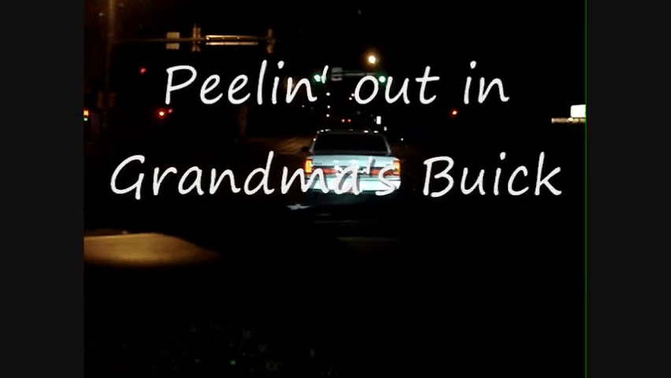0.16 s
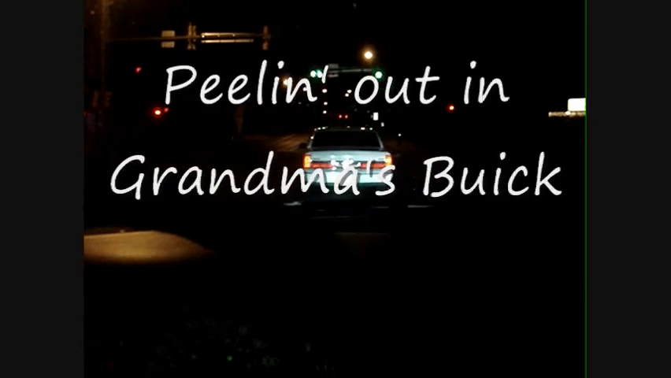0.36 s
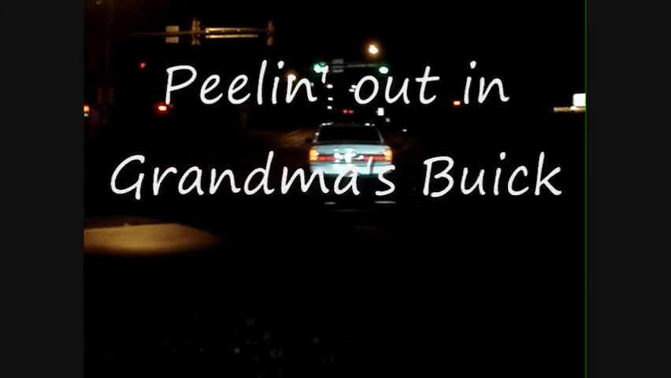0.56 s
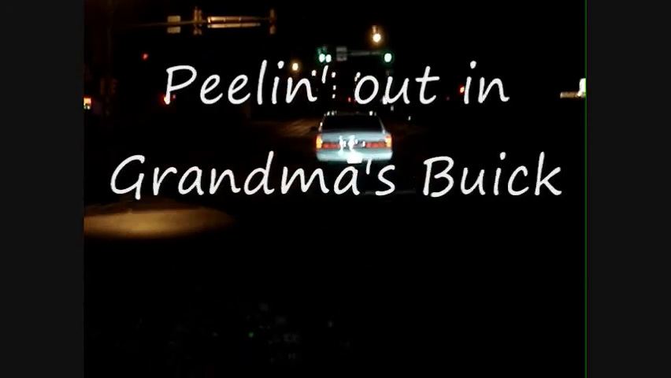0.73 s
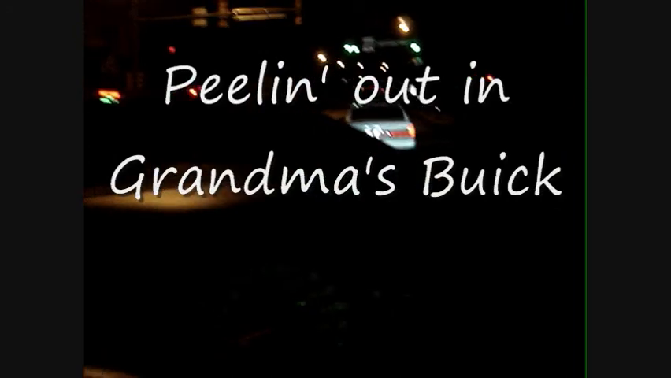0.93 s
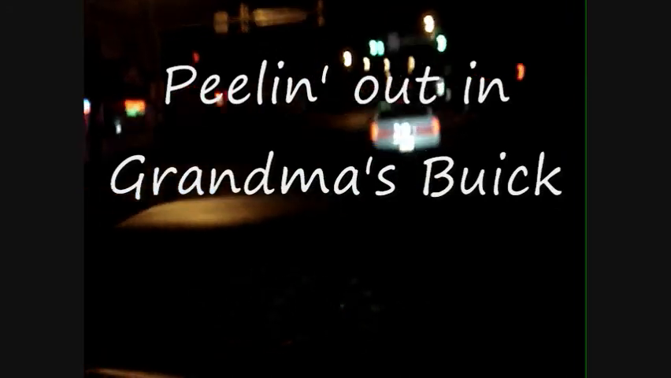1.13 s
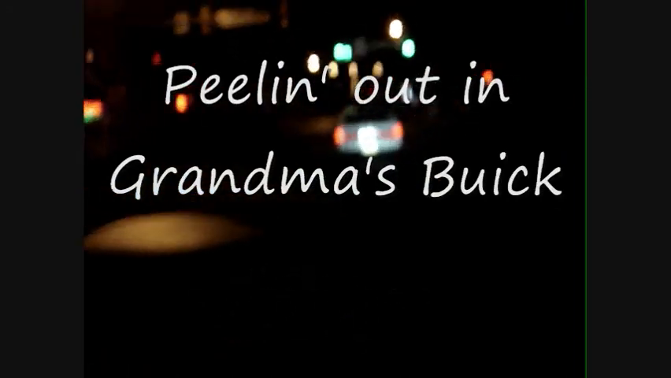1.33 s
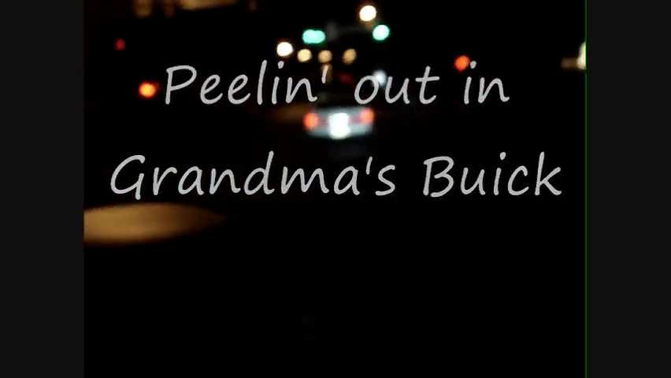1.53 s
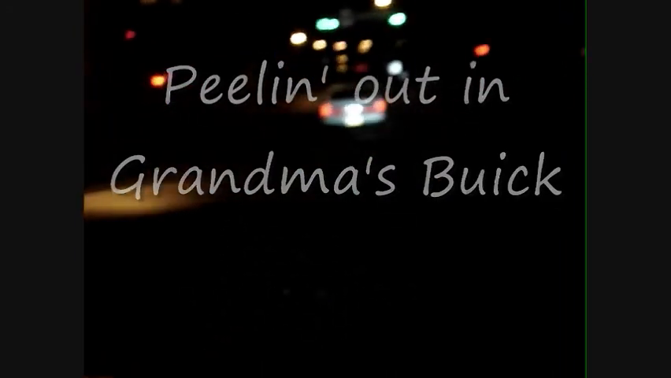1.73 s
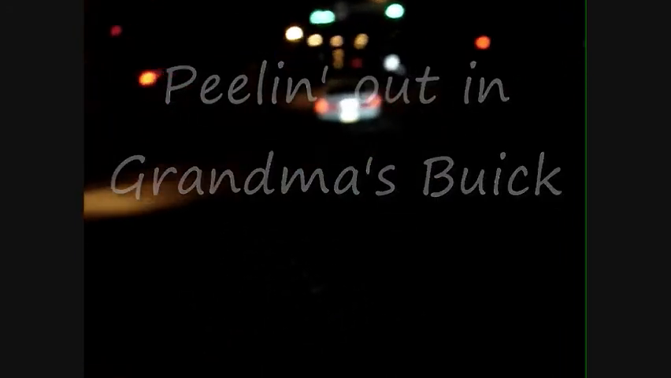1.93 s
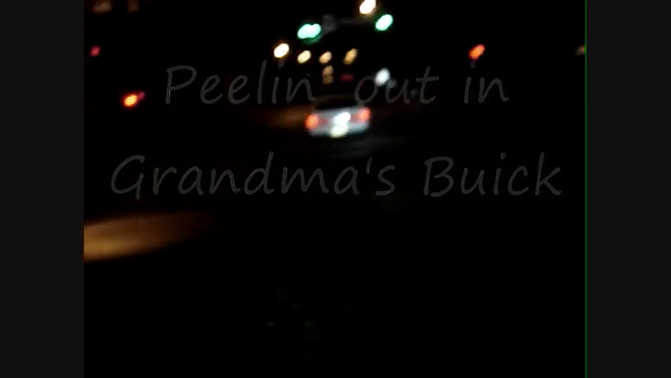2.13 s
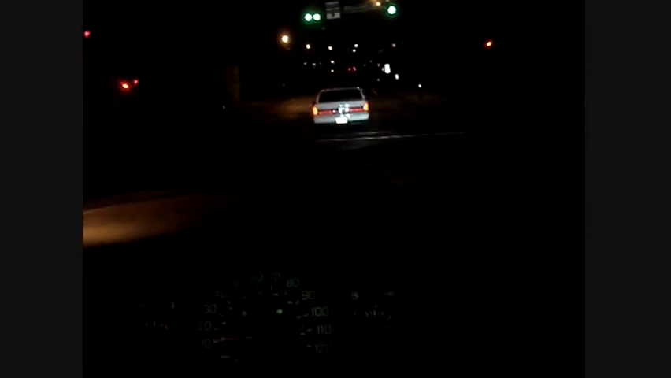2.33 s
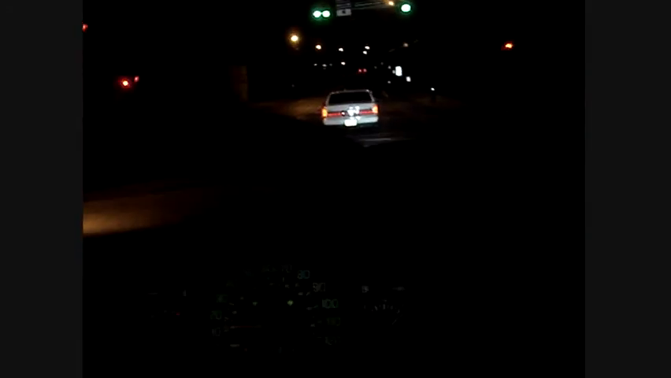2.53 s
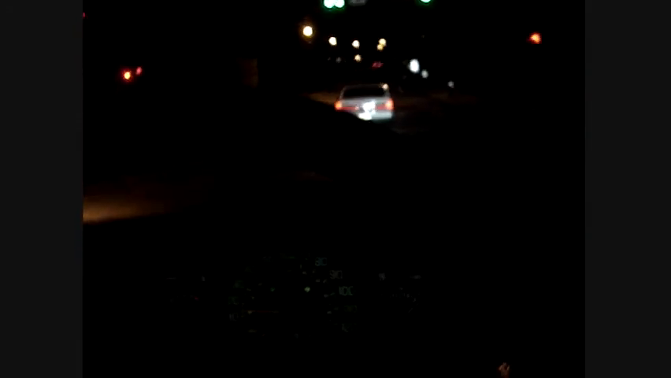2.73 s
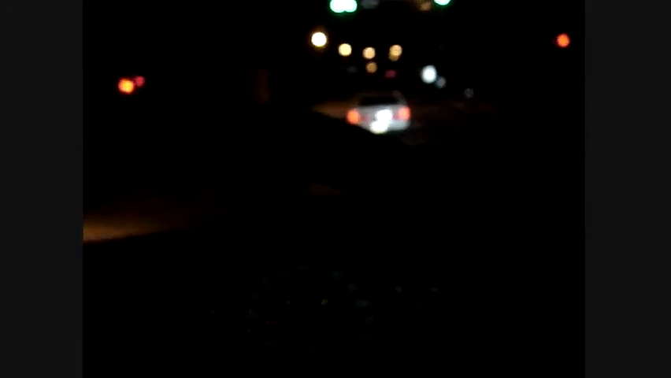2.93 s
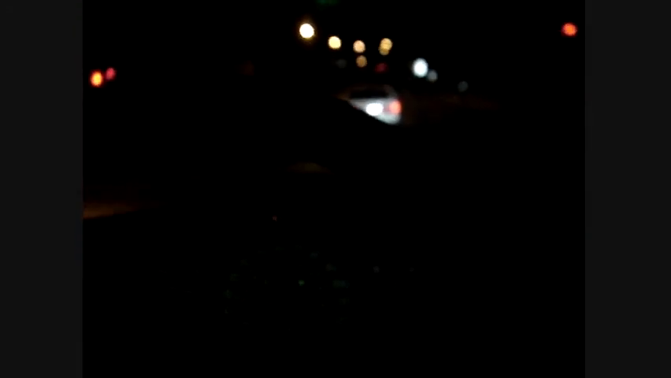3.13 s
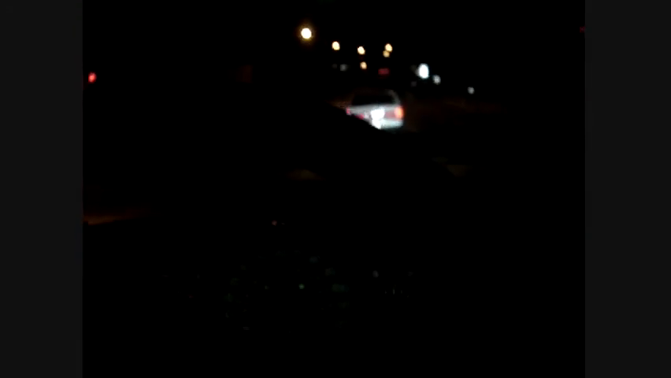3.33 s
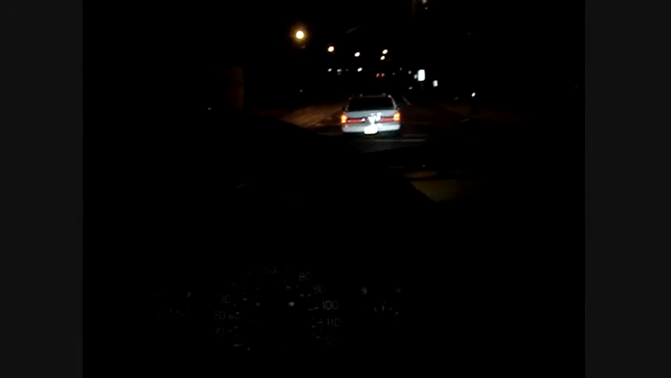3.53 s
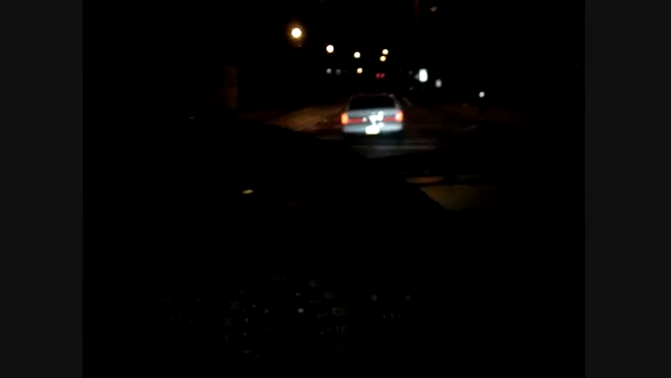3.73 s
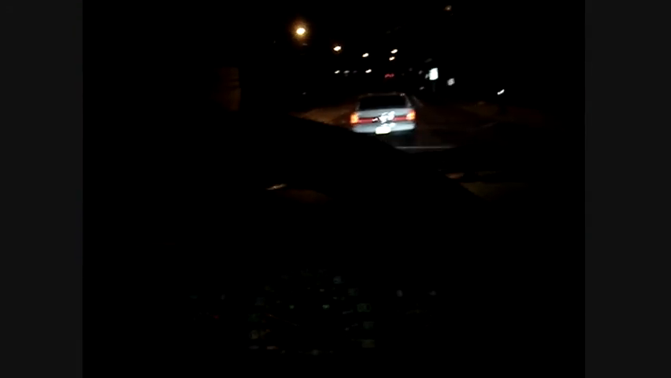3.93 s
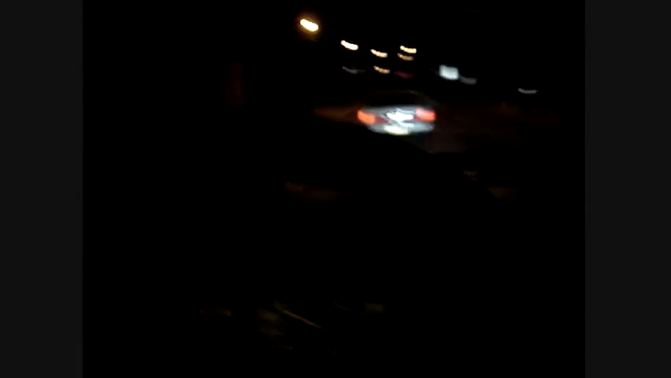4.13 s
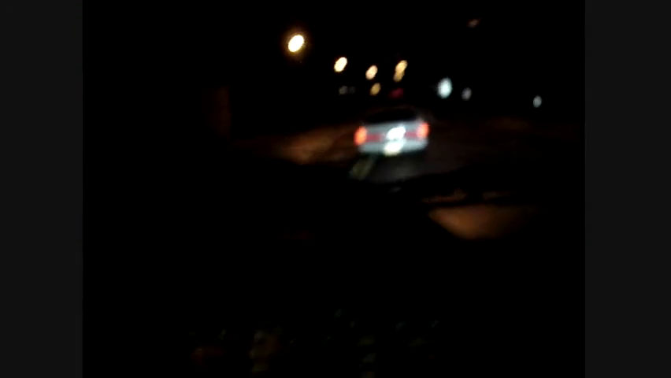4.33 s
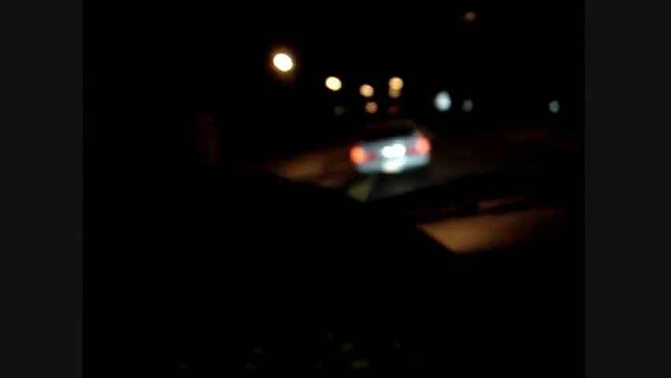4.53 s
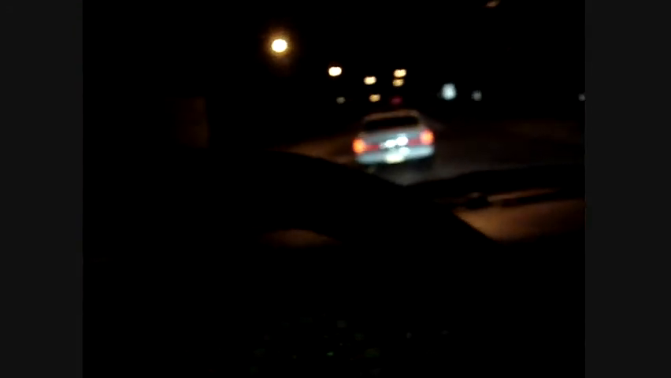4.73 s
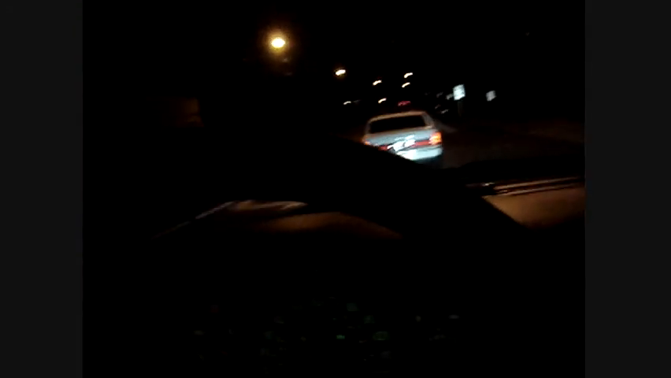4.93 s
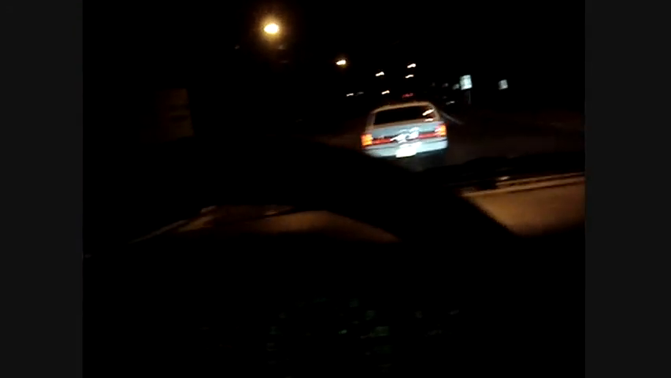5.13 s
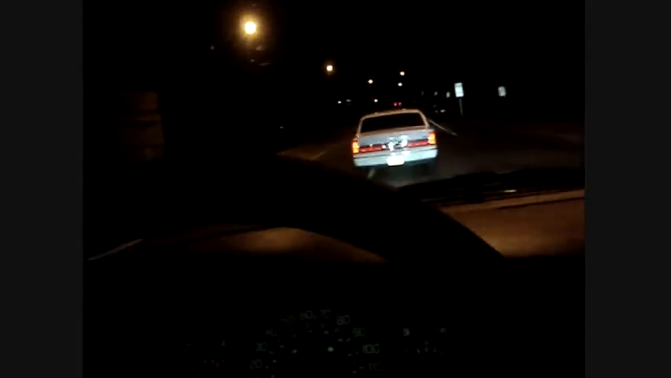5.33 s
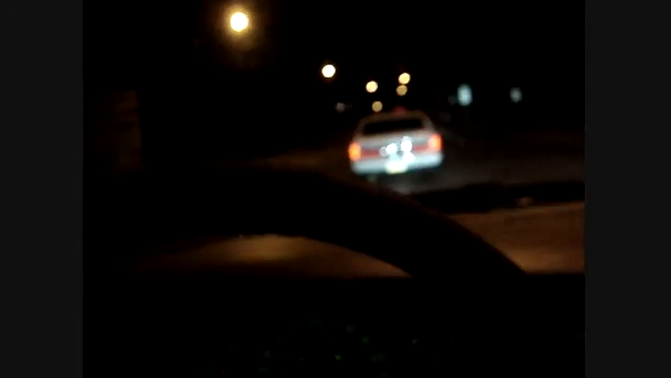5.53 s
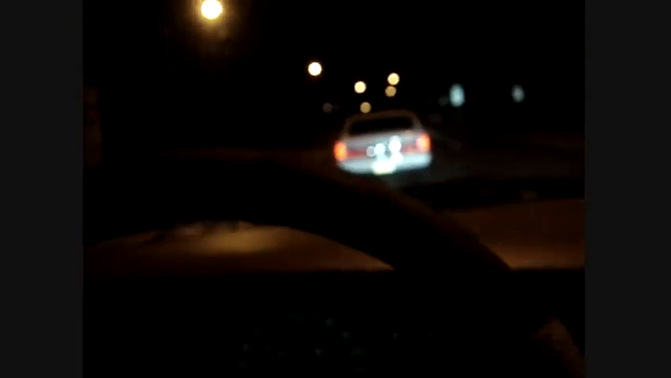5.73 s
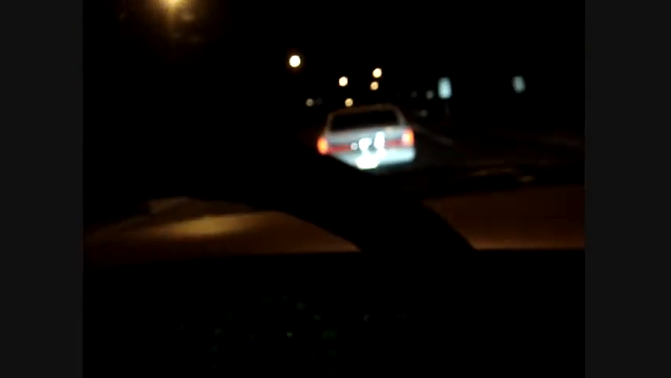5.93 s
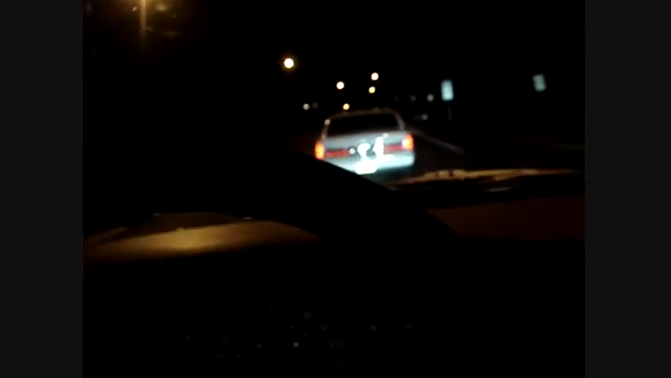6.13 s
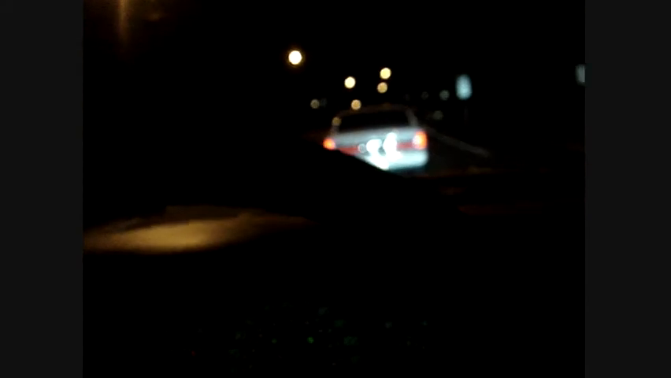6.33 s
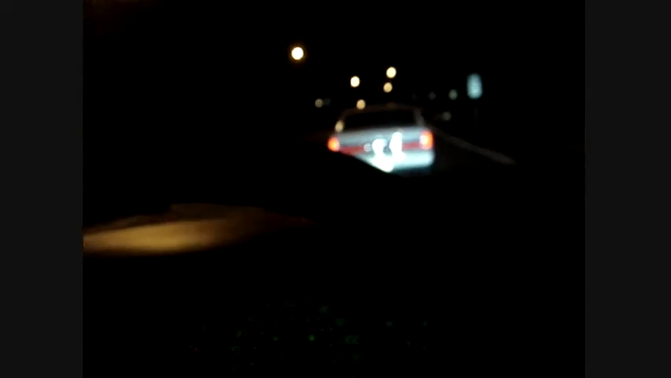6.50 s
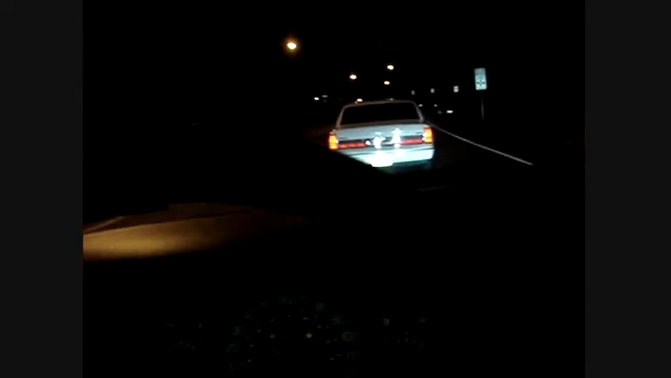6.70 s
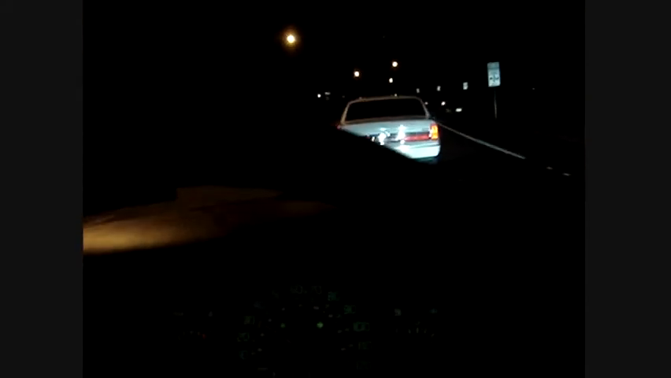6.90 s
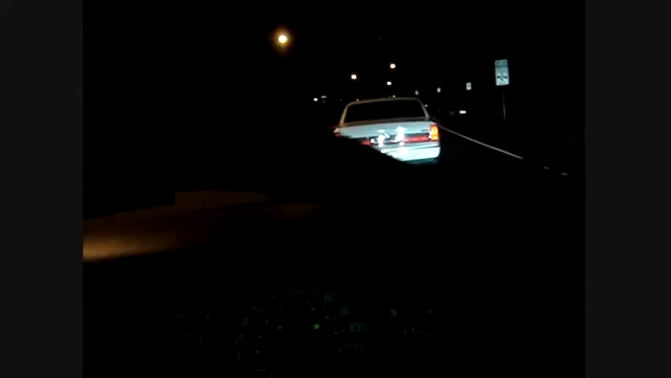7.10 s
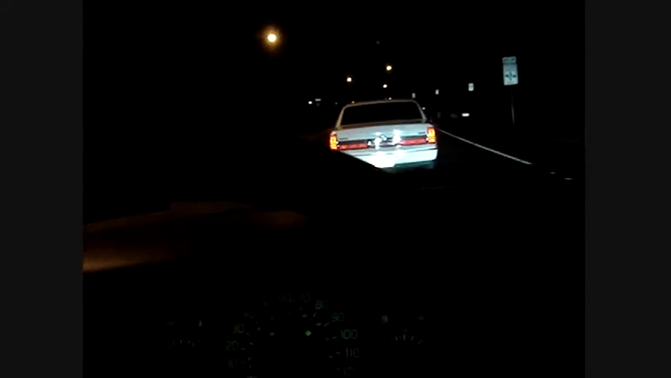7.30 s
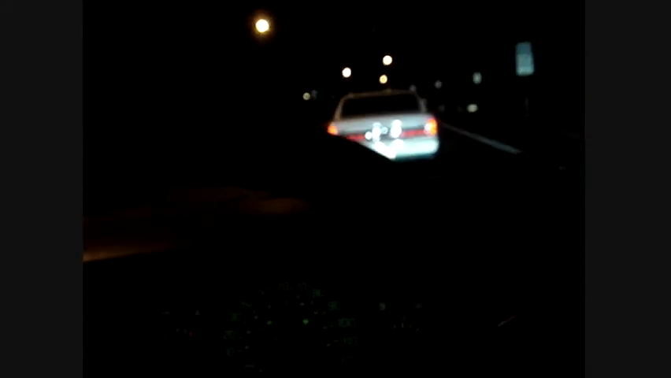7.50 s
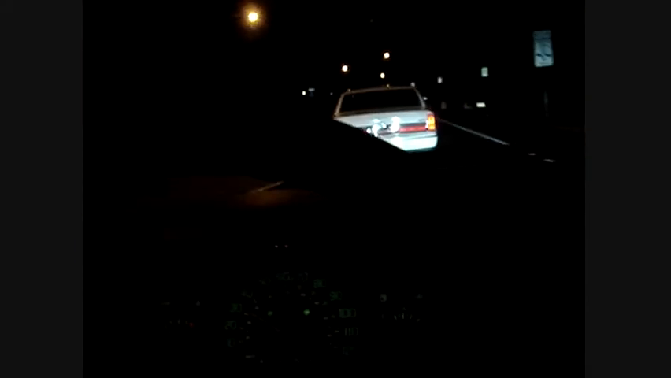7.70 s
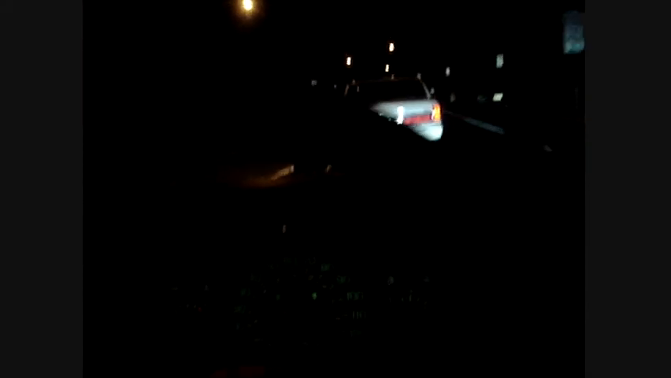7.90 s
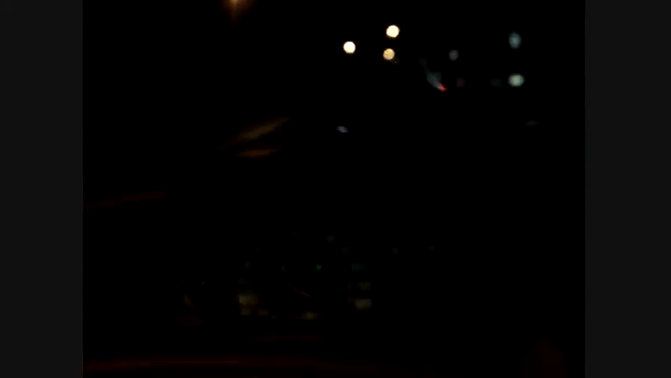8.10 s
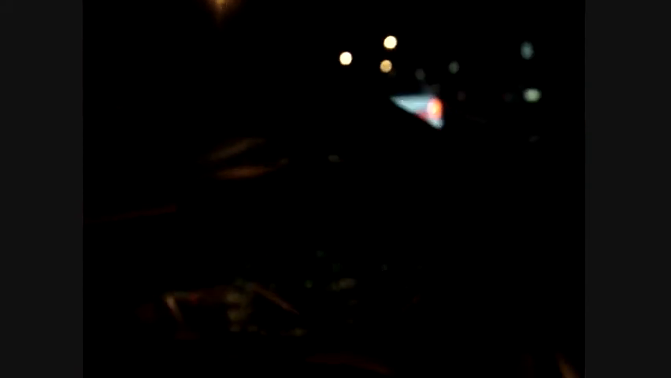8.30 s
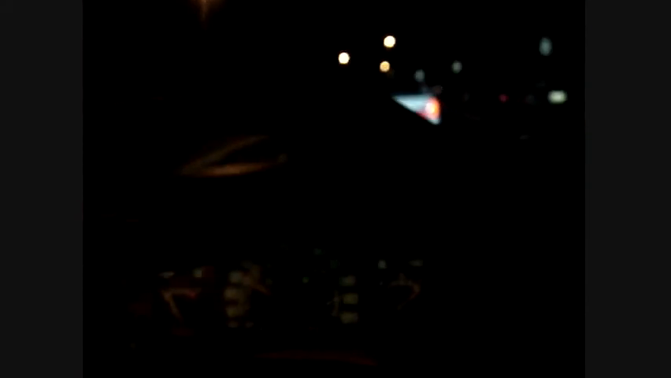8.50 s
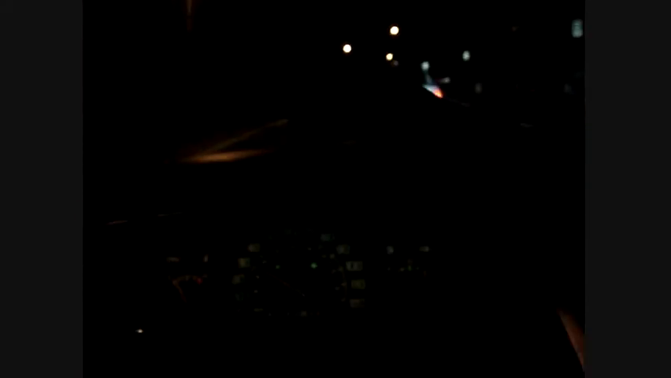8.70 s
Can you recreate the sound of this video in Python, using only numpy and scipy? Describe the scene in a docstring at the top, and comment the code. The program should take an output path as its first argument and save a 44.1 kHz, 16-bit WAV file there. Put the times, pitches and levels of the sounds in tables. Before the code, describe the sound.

Inside a loud V8 car: lumpy idle, sudden hard launch with squealing tyres, engine climbing to a roar, lift-off, coasting, then throttle picks up again.

```python
"""Hard launch from inside a V8 car

With loud mufflers the car idles, launches with both rear tyres squealing, revs up through first gear,
lifts off, coasts and picks up again. The engine is a stack of sine orders locked to its cycle, with gas noise;
the squeals are jittery tones with overtones; boom, road, rasp, hiss and cabin drone are shaped noise.
A loose plastic part ticks close to the microphone: noise chatter ringing a bank of resonances."""
import sys
import numpy as np
from scipy import signal
from scipy.fft import rfft, irfft, next_fast_len
from scipy.io import wavfile
from scipy.ndimage import uniform_filter1d

SR = 44100
rng = np.random.default_rng(int(sys.argv[2]) if len(sys.argv) > 2 else 0)


def wrap_up_sound(samples):
    """Save the sound to the file named by the first command line argument, as 16-bit audio."""
    columns = np.atleast_2d(samples).T
    # keep every value between -1 and 1, then stretch to whole-number steps
    tamed = np.clip(columns, -1, 1)
    steps = np.round(tamed * 32767).astype(np.int16)
    wavfile.write(sys.argv[1], SR, steps)


N = 385875

# the throttle opens and shuts at these moments; each move takes one ramp
THROTTLE_OPENS_S, THROTTLE_SHUTS_S, THROTTLE_RAMP_S = 0.73, 4.3, 0.13


def from_db(db):
    """Gain of a level in dB."""
    return 10 ** (np.asarray(db) / 20)


def rms_one(x):
    """Scaled to rms 1."""
    return x / np.sqrt(np.mean(x ** 2) + 1e-20)


def in_time(rows):
    """Every column of a curve table, drawn as straight lines to every sample."""
    s, *columns = np.transpose(rows)
    return [np.interp(np.arange(N) / SR, s, column) for column in columns]


def drift(rate_hz):
    """Slow random wander of rms 1: noise at a twentieth of SR through two equal one-pole low-passes."""
    r = np.exp(-2 * np.pi * rate_hz * 20 / SR)
    noise = rng.standard_normal(N // 20 + 4002)
    slow = signal.lfilter([1], [1, -2 * r, r * r], noise)[4000:]   # settled part only
    return np.interp(np.arange(N) / 20, np.arange(len(slow)), rms_one(slow))


def swells(events, width_s):
    """Bell-shaped changes of level in dB around each event."""
    t = np.arange(N) / SR
    return sum(db * np.exp(-((t - s) / width_s) ** 2) for s, db in events)


def resonance(x, hz, width_hz):
    """Two-pole band-pass of gain 1 on top."""
    r = np.exp(-np.pi * width_hz / SR)
    zeros = (1 - r * r) / 2 * np.array([1, 0, -1])
    poles = [1, -2 * r * np.cos(2 * np.pi * hz / SR), r * r]
    return signal.lfilter(zeros, poles, x)


def coloured(spectrum, source):
    """A source shaped by a (Hz, dB) spectrum, straight lines over log frequency; rms 1."""
    hz, level_db = np.transpose(spectrum)
    size = next_fast_len(N + SR // 4)
    log_hz = np.log(np.arange(size // 2 + 1) * SR / size + 1e-3)
    gain = from_db(np.interp(log_hz, np.log(hz), level_db, left=-90, right=-90))
    return rms_one(irfft(rfft(source, size) * gain, size)[:N])


def pipes(x, resonances):
    """Resonances in a row, each lifting what passes through it."""
    for hz, width_hz, lift_db in resonances:
        x = x + (from_db(lift_db) - 1) * resonance(x, hz, width_hz)
    return x


def engine():
    """Eight firings a cycle give the main tone; other orders, the firing's own overtones among them, colour it."""
    # Engine speed. Each row: time in seconds, four-stroke cycles per second.
    speed = [(0, 4.6), (.6, 4.65), (.72, 6), (.8, 11.5), (.98, 15.4), (1.1, 16.9), (1.54, 19.3),
             (1.75, 19.9), (2.08, 18.6), (2.57, 20.54), (3.45, 24.85), (4.22, 29), (4.32, 28.4),
             (4.49, 24.5), (4.83, 20.6), (4.93, 19.55), (5.04, 16.8), (5.16, 14.7), (5.3, 13.3),
             (5.7, 11.8), (7.95, 10), (8.08, 10.7), (8.2, 12.1), (8.32, 13), (8.47, 13.5), (8.75, 13.7)]
    # Engine effort. Each row: time in seconds, firing tone in dB before the response,
    # load as the level of the other orders in dB.
    effort = [(0, -45, -58), (.62, -42.5, -56), (.8, -24, -25.5), (1, -19.5, -19), (1.2, -21.5, -20),
              (1.45, -37, -29.5), (1.75, -33, -28), (2.3, -29.5, -26.5), (2.6, -30.5, -21),
              (3.2, -27.5, -21.5), (4.15, -23, -19.5), (4.4, -47, -31.5), (4.6, -56, -32),
              (4.78, -51, -36.5), (4.9, -22.5, -24), (5.05, -30.5, -32.5), (5.22, -43, -36.5),
              (5.5, -53, -43), (7.95, -55, -42), (8.2, -22, -29), (8.4, -28.5, -29.5), (8.75, -27, -28)]
    # Balance of the other orders. Each row: multiple of the cycle rate, relative level in dB.
    other_orders = [(1, -23), (2, -25), (3, -9), (4, 6), (6, -0.5), (7, -3), (9, 0.5), (10, -3.5), (11, 2),
                    (12, -5), (13, -34), (14, 2), (17, -3.5), (19, -12), (20, -5.5), (21, -4), (22, -5),
                    (23, -22), (25, -2), (26, -10), (27, -21.5), (28, -4), (29, -18), (30, -5), (31, -12.5),
                    (32, -7), (33, -27.5), (34, -18.5), (35, -20.5), (36, -15), (37, -29.5), (38, -7),
                    (39, -12), (40, -23), (41, -39), (42, -18), (43, -27), (44, -8.5)]
    # Orders that stand out on open throttle. Each row: multiple of the cycle rate, level in dB against the load.
    standouts = [(5, -8), (15, -9.5), (16, -11.5), (18, -8), (24, -7.5)]
    # How exhaust and cabin pass a tone that sweeps through them. Each row: frequency in Hz, gain in dB.
    response = [(35, 2.5), (70, -10), (105, 1.5), (128, 7.5), (146, -1.5), (157, 8.5), (170, -1.5),
                (187, 5), (201, -11), (215, 5.5), (240, -5), (270, -8.5), (305, 10), (328, 8.5), (360, -6),
                (382, -13), (403, 0), (440, -4), (470, -1), (545, -17), (605, -4), (700, -5)]
    # Resonances of pipes and cabin. Each row: frequency in Hz, width in Hz, lift in dB.
    pipe_modes = [(125.8, 24, 10), (158.5, 40, 7), (234, 14, 2), (305.2, 37.6, 12.5), (414, 41, 4.5),
                  (611.7, 30.6, 13.5), (980, 83, 6), (1647, 31, 10.5), (4460, 490, -16.5)]
    # Colour of the gas noise. Each row: frequency in Hz, relative level in dB per Hz.
    roar_colour = [(35, -45), (60, -18), (119, -8.5), (203, -2), (319, -9.5), (468, -12), (606, -16.5),
                   (734, -8.5), (949, -23), (1080, -29.5), (4070, -33), (10000, -61), (13000, -95),
                   (22000, -120)]
    shut_tilt_db = -6   # per octave above the firing tone: the orders are duller once the throttle shuts
    roar_at_load_db, roar_follows = -28, 0.51   # at a load of -25 dB; share of the load's swing

    cycle_hz, = in_time(speed)
    firing_db, load_db = in_time(effort)
    t = np.arange(N) / SR
    since_open = t - THROTTLE_OPENS_S
    until_closed = THROTTLE_SHUTS_S + THROTTLE_RAMP_S - t
    pull = np.clip(np.minimum(since_open, until_closed) / THROTTLE_RAMP_S, 0, 1)
    turn = 2 * np.pi * np.cumsum(cycle_hz) / SR
    hz, pass_db = np.transpose(response)

    def tone(k, level_db):
        """One order, coloured by the response at its pitch of the moment."""
        gain = from_db(level_db + np.interp(np.log(k * cycle_hz), np.log(hz), pass_db))
        return np.sqrt(2) * gain * np.sin(k * turn + rng.uniform(0, 2 * np.pi))

    firing = tone(8, firing_db)
    leading = firing + pull * sum(tone(k, load_db + db) for k, db in standouts)

    orders = 0
    for k, level_db in other_orders:
        waver_db = 2.5 * drift(4)
        dull_db = shut_tilt_db * (1 - pull) * (t > THROTTLE_SHUTS_S) * np.log2(k / 8)
        phase = rng.uniform(0, 2 * np.pi)
        orders = orders + from_db(level_db + waver_db + dull_db) * np.sin(k * turn + phase)
    orders = pipes(orders, pipe_modes)
    # evened over half a second, so that the load sets the level
    orders = orders / np.sqrt(uniform_filter1d(orders ** 2, size=SR // 2))

    # gas noise swells with each firing and each cycle
    puffs = 1 + .4 * np.cos(8 * turn) + .3 * np.cos(turn)
    roar = pipes(coloured(roar_colour, puffs * rng.standard_normal(N)), pipe_modes)
    roar_db = roar_at_load_db + roar_follows * (load_db + 25)
    return leading + from_db(load_db) * orders + from_db(roar_db) * rms_one(roar)


def cabin():
    """Lumpy boom of the body, road noise with a tread resonance, a rasp of gas and rubber, and thin air hiss."""
    # Mix of the noises. Each row: time in seconds, body boom in dB before bumps and waver,
    # road noise in dB before the tread resonance, rasp in dB before its rings.
    mix = [(0, -41.5, -54.5, -58.5), (.65, -41, -52.5, -54.5), (.85, -40, -37, -42),
           (1.07, -36, -29.5, -36), (1.35, -38.5, -31.5, -35.5), (1.7, -45, -36, -40.5),
           (2, -43, -33, -43.5), (2.7, -34, -28, -39.5), (3.7, -28, -26, -38), (4.2, -22, -23, -33),
           (4.6, -30.5, -28.5, -42.5), (5.5, -32, -30.5, -48.5), (6.3, -34.5, -30.5, -49),
           (7.25, -36, -31.5, -52.5), (7.6, -26, -31.5, -51), (8, -26.5, -32, -49), (8.75, -32, -31, -50)]
    # Bumps in the road swell the boom. Each row: time in seconds, swell in dB.
    bumps = [(.95, 6), (1.34, 11.5), (1.61, 3), (2.17, 11), (2.31, 6), (2.56, 12), (2.85, 13), (3.24, 12),
             (3.75, 5.5), (3.97, 7), (4.46, 3), (4.85, 6), (5.02, 12), (5.21, 11), (5.34, 6.5), (5.68, 9),
             (5.85, 10.5), (6.48, 0), (6.63, 5), (8.43, 4)]
    # Colours of the four noises. Each row: frequency in Hz, relative level in dB per Hz.
    boom_colour = [(15, -24.5), (26, -10.5), (36, -1.5), (46, -3), (58, -6), (90, -11.5), (140, -18),
                   (200, -45.5)]
    road_colour = [(35, -40), (60, -13), (87, -3.5), (123, -2.5), (172, -14), (189, -19.5), (227, -10.5),
                   (342, -8), (375, -10.5), (730, -11), (928, -9.5), (1040, -15.5), (5000, -50),
                   (6500, -84), (11000, -120)]
    rasp_colour = [(900, -24.5), (1200, -9.5), (2100, -12.5), (3000, -16.5), (4500, -23.5), (7000, -28.5),
                   (12000, -57)]
    hiss_colour = [(1200, -17), (2500, -7.5), (5000, -12), (8000, -11), (12000, -6.5)]
    # The rasp rings faintly. Each row: frequency in Hz, width in Hz, lift in dB.
    rasp_rings = [(1605, 37, 4.5), (2210, 130, 1.5), (4230, 110, 5)]
    bump_s, boom_waver_db = 0.053, -1
    tread_hz, tread_width_hz, tread_db = 938, 26, 2
    hiss_at_rasp_db, hiss_follows = -55, 0.39   # at a rasp of -45 dB; share of the rasp's swing

    boom_db, road_db, rasp_db = in_time(mix)
    boom_db = boom_db + swells(bumps, bump_s) + boom_waver_db * drift(4.9)
    hiss_db = hiss_at_rasp_db + hiss_follows * (rasp_db + 45)
    hiss_db = hiss_db + 2.85 * drift(28)   # the hiss flickers
    boom = coloured(boom_colour, rng.standard_normal(N))
    road = coloured(road_colour, rng.standard_normal(N))
    road = road + from_db(tread_db) * resonance(road, tread_hz, tread_width_hz)
    rasp = pipes(coloured(rasp_colour, rng.standard_normal(N)), rasp_rings)
    hiss = coloured(hiss_colour, rng.standard_normal(N))
    low = from_db(boom_db) * boom + from_db(road_db) * road
    return low + from_db(rasp_db) * rasp + from_db(hiss_db) * hiss


def drone():
    """Engine and road shake two air modes: narrow noise, silent during the launch, heard at idle and from lift-off."""
    # Idle rows, then rows from lift-off on. Each row: time in seconds, lower mode in dB, upper mode in dB.
    idle, coast = [
        [(0, -41.5, -55), (.75, -47, -58)],
        [(4.3, -32, -30), (4.55, -24, -26), (4.9, -43, -32.5), (5.35, -28, -33.5), (5.6, -46, -40),
         (7.1, -49.5, -42), (7.3, -28.5, -41), (7.6, -44, -38), (7.85, -36, -55), (8, -42, -30),
         (8.35, -37, -27), (8.75, -45, -29)],
    ]
    modes_hz, width_hz = (119, 158), 9   # width of each of two passes
    launch = [(idle[-1][0] + .1, -70, -70), (coast[0][0] - .1, -70, -70)]
    out = 0
    for hz, level_db in zip(modes_hz, in_time([*idle, *launch, *coast])):
        once = resonance(rng.standard_normal(N), hz, width_hz)
        mode = resonance(once, hz, width_hz)
        # driven without pause, the mode holds its level
        held = mode / np.sqrt(uniform_filter1d(mode ** 2, size=SR // 10))
        out = out + from_db(level_db) * held
    return out


def ticks():
    """Each tick or knock is a short chatter of contacts that rings the modes of the plastic part."""
    # Sharp ticks. Each row: start in seconds, peak in dB, trim of the low modes in dB, trim of the treble modes in dB.
    sharp_rows = [(0.8609, -24.5, -11, -8), (2.5087, -29, -10, -25), (2.957, -27.5, -11, -27),
                  (3.0395, -24.5, -10, -23), (3.2071, -30, -8, -26), (3.8216, -18.5, -15, -9),
                  (4.036, -23, -6, -21), (4.0687, -17, -11, -6), (4.0754, -14.5, -12, -4),
                  (4.0977, -21, -12, -26), (4.1824, -14.5, -15, -23), (4.2564, -16, -15, -17),
                  (4.3241, -23, -10, -20), (4.335, -22, -10, -23), (4.3904, -23, -12, 1),
                  (4.4668, -13.5, -12, -10), (4.482, -14, -6, -7), (4.9422, -20, -15, -8),
                  (4.9513, -23, -8, -19), (4.964, -19, -11, -9), (5.032, -20, -17, -14),
                  (5.0765, -23.5, -19, -24), (5.2427, -24, -14, -24), (5.4267, -17.5, -14, -5),
                  (5.4488, -22, -10, -13), (5.4585, -23, -11, -11), (5.7294, -26.5, -8, -19),
                  (5.7833, -19.5, -17, -16), (5.8343, -23.5, -14, -20), (5.8644, -26, -13, -16),
                  (5.877, -21.5, -14, -16), (5.9193, -13.5, -15, -24), (5.931, -18.5, -13, -18),
                  (6.011, -24.5, -19, -22), (6.0515, -23.5, -20, -16), (6.4206, -11.5, -13, -23),
                  (6.4324, -28, -15, -27), (6.5595, -29, -13, -14), (7.4773, -26.5, -17, -28),
                  (7.6535, -34, -14, -19), (7.6923, -24, -20, -18), (7.9054, -28.5, -16, -25),
                  (7.9438, -27.5, -17, -24), (8.0616, -24, -15, -17), (8.1454, -28.5, -14, -15),
                  (8.1898, -21.5, -16, -18), (8.2314, -27, -17, -23), (8.2746, -26.5, -16, -17),
                  (8.413, -33, -10, -11), (8.5974, -24, -19, -16)]
    # Duller knocks of the same part. Each row: start in seconds, peak in dB.
    knocks = [(0.633, -35), (2.0827, -26), (5.5737, -25), (5.6186, -32), (5.6835, -25.5), (6.3934, -26.5),
              (6.5084, -33), (6.8734, -32), (6.9726, -30), (7.1157, -44), (8.0324, -34)]
    # Modes of the part. Each row: frequency in Hz before a small shift, relative level in dB, t60 in seconds.
    plastic = [(1900, 1.5, .008), (2280, 7, 0.0041), (2854, 4, 0.0094), (3520, -3.5, 0.0026),
               (4140, 3.5, 0.011), (4900, -1, 0.021), (6000, 5, 0.00098), (7800, -10.5, .0023),
               (10620, 7.5, 0.00063)]
    chatter_t60_s, chatter_grows_s = 0.055, 0.0011   # at a peak of -24 dB; longer per dB of peak
    faint_per_s, faint_db = 1.5, -35   # stray faint ticks once the throttle has opened
    knock_body_db, knock_treble_db, knock_t60_s = 10, -30, .018   # a knock hardly chatters

    faint_s = np.cumsum(rng.exponential(1 / faint_per_s, size=40)) + THROTTLE_OPENS_S
    faint = [(s, faint_db, -10, -18) for s in faint_s if s < N / SR]
    sharp = [(*row, chatter_t60_s + chatter_grows_s * (row[1] + 24)) for row in [*sharp_rows, *faint]]
    dull = [(s, db, knock_body_db, knock_treble_db, knock_t60_s) for s, db in knocks]

    out = np.zeros(N + SR)
    length = SR // 8
    t = np.arange(length) / SR
    mode_hz = np.transpose(plastic)[0]
    for s, peak_db, body_db, treble_db, t60 in dull + sharp:
        decay = from_db(-60 * t / np.clip(t60, .005, .2))
        chatter = rng.standard_normal(length) * decay * np.minimum(t / .0005, 1)
        chatter[round(.0005 * SR)] += 4.0   # a sharp early contact
        trim_db = rng.normal(0, 2, len(plastic)) + body_db * (mode_hz < 2500) + treble_db * (mode_hz > 5500)
        shifts = rng.normal(1, .015, len(plastic))   # the modes shift with how the part is held
        sound = 0
        for (hz, level_db, ring_s), own_db, shift in zip(plastic, trim_db, shifts):
            width_hz = np.log(1000) / np.pi / ring_s
            sound = sound + from_db(level_db + own_db) * resonance(chatter, hz * shift, width_hz)
        at = round(s * SR)
        out[at:at + length] += from_db(peak_db) * sound / np.max(np.abs(sound))
    return out[:N]


def tyre(rows, grips, overtones, waver, jitter, throb_db, rough, steepen):
    """Tread blocks stick and slip: a wavering, jittery tone with overtones that throbs as the grip changes."""
    hz, level_db = in_time(rows)
    level_db = level_db - swells(grips, width_s=0.0071)
    t = np.arange(N) / SR
    fade_in = np.clip((t - rows[0][0]) / 0.073, 0, 1)
    fade_out = np.clip((rows[-1][0] - t) / 0.027, 0, 1)
    unsteady_hz = hz * (1 + waver * drift(38.8) + jitter * drift(210))
    turn = 2 * np.pi * np.cumsum(unsteady_hz) / SR
    tone = 0
    for k, share_db in overtones:
        above = max(k - 1, 0)
        scatter = rough * above * drift(150)   # the higher overtones smear into rough bands
        strain_db = steepen * above * (level_db - level_db.max())   # overtones grow with the force of the slip
        gain = from_db(share_db + strain_db + throb_db * drift(53))
        tone = tone + gain * np.sin(k * turn + scatter)
    return np.sqrt(2) * fade_in * fade_out * from_db(level_db) * tone


def street(x):
    """The squeal lingers between road, kerbs and house fronts: a tail of noise dying by 60 dB in half a second."""
    tail = rng.standard_normal(SR) * from_db(-60 * np.arange(SR) / SR / .5)
    tail = tail / np.sqrt(np.sum(tail ** 2))
    wet_db = -13
    return x + from_db(wet_db) * signal.fftconvolve(x, tail)[:N]


def scene():
    """All sources at one microphone."""
    # First tyre. Each row: time in seconds, slip rate in Hz before waver, level in dB before its overtone shares.
    slip_one = [(.97, 1440, -40), (1, 1450, -20.5), (1.05, 1330, -32.5), (1.075, 1289, -19),
                (1.14, 1235, -16.5), (1.2, 1228, -15), (1.358, 1223, -14), (1.382, 1141, -12),
                (1.668, 1149, -12.5), (1.696, 1140, -21), (1.765, 1222, -25.5), (1.826, 1269, -19),
                (1.87, 1230, -50)]
    # Second tyre, heard mostly an octave above its slip rate.
    # Each row: time in seconds, that octave in Hz before waver, level in dB before its overtone shares.
    slip_two = [(.97, 2850, -33.5), (1.06, 2503, -31.5), (1.13, 2385, -19.5), (1.27, 2305, -20),
                (1.31, 2204, -15.5), (1.42, 2048, -25), (1.6, 2080, -21.5), (1.65, 2022, -24.5),
                (1.75, 2185, -20), (1.82, 2406, -35), (1.86, 2167, -42), (2.25, 2150, -50)]
    # Moments when a tyre grips and its squeal breaks off. Each row: time in seconds, drop in dB.
    grips_one = [(1.158, 29)]
    grips_two = [(1.104, 7.8), (1.18, 10), (1.346, 13), (1.632, 13)]
    # Overtones of each squeal. Each row: multiple of the tyre's tabled pitch, share in dB.
    overtones_one = [(1, 0), (2, -14), (3, -27), (4, -37)]
    overtones_two = [(.5, -13.5), (1, -2), (1.5, -20), (2, -26)]

    first = tyre(slip_one, grips_one, overtones_one,
                 waver=0.00526, jitter=0.0075, throb_db=3.5, rough=0.48, steepen=1.0)
    second = tyre(slip_two, grips_two, overtones_two,
                  waver=.011, jitter=.017, throb_db=2.5, rough=1.7, steepen=0.11)
    mix = engine() + cabin() + drone() + ticks() + street(first + second)
    return mix[None]


def record(dry):
    """The microphone drops the lowest bass, the highest peaks are rounded and the top is cut."""
    ceiling = .97
    stop_hz = 10550   # from here up the cut is 70 dB deep
    thinned = signal.sosfilt(signal.butter(2, 27, "high", fs=SR, output="sos"), dry)
    rounded = thinned / (1 + np.abs(thinned / ceiling) ** 8) ** (1 / 8)
    return signal.sosfilt(signal.cheby2(18, 70, stop_hz, fs=SR, output="sos"), rounded)


dry = scene()
out = record(dry)
wrap_up_sound(out)
```